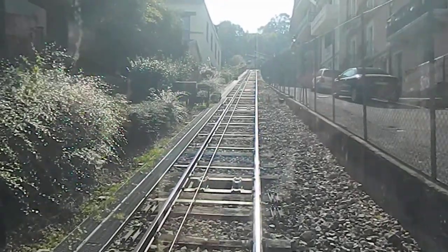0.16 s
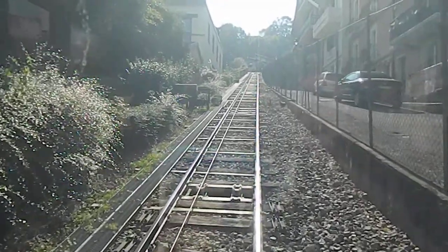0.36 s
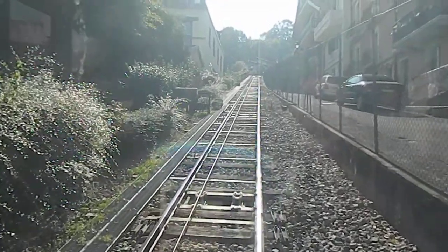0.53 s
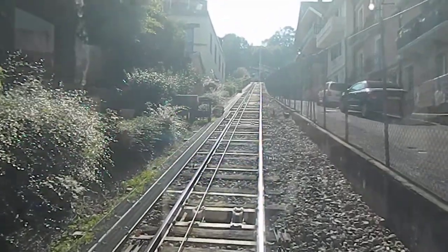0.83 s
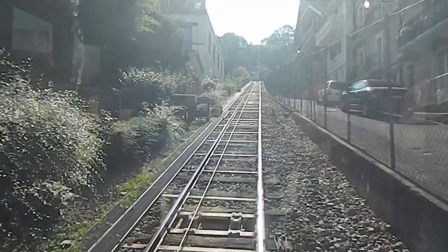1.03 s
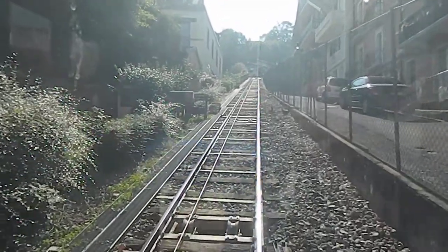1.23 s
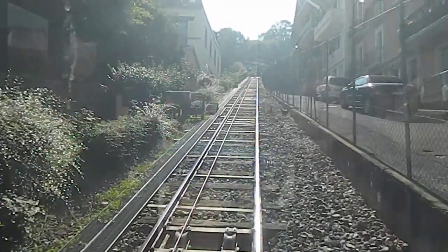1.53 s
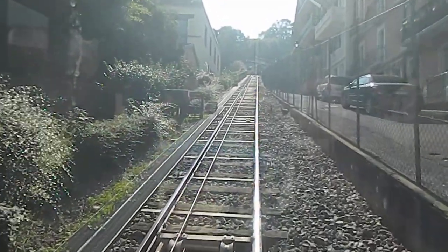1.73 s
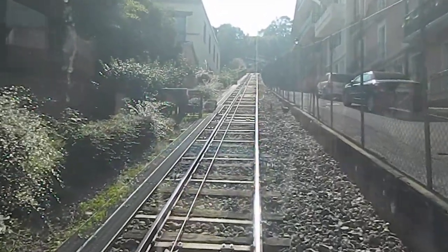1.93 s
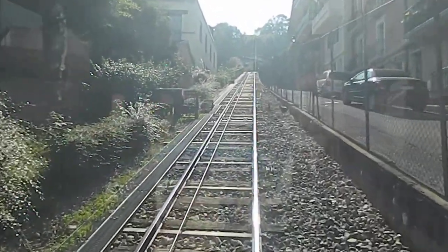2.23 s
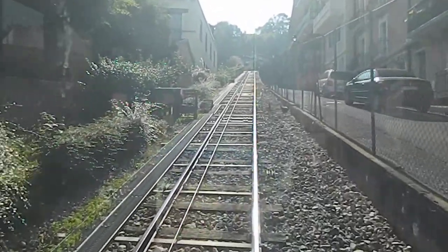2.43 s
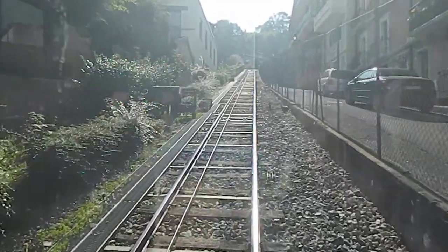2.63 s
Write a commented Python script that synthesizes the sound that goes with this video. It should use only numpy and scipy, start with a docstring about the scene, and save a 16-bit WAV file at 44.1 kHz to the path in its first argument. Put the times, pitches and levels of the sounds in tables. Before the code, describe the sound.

A funicular car rumbles low and steadily as it rolls uphill, heard from inside the cabin. A hum at the start turns rough, soft bumps come from the track, and the wheels swell into a brief clatter past the middle.

```python
"""Inside a funicular car rolling slowly uphill. The wheels shake the car body into a low rumble, with a
hum at first and soft bumps from the track. Steel rolls on the rails with a dull roar that swells into
a short clattering rush. Thin air hiss and a few brief scrapes lie on top, and the close walls add a
short echo."""
import sys
import numpy as np
from scipy import signal
from scipy.fft import rfft, irfft
from scipy.io import wavfile
from scipy.ndimage import uniform_filter1d

SR = 44100
rng = np.random.default_rng(int(sys.argv[2]) if len(sys.argv) > 2 else 0)


def materialize(psi):
    """Save the field psi as 16-bit PCM at rate SR to the path in sys.argv[1].

    A 1-D psi becomes a single channel; in a 2-D psi each row is a channel.
    """
    bounded = np.clip(np.atleast_2d(psi).T, -1, 1)
    quanta = np.round(bounded * 32767).astype(np.int16)
    wavfile.write(sys.argv[1], SR, quanta)


N = 122157
TIME = np.arange(N) / SR
FREQS = np.maximum(np.arange(N // 2 + 1) * SR / N, 1)  # Hz, never below 1

def gain(db):
    """Turn decibels into a number to multiply by."""
    return 10 ** (np.asarray(db) / 20)

def unit(x):
    """Scale a signal to an average power of 1."""
    return x / np.sqrt(np.mean(x ** 2))

def over_time(rows):
    """Join (t/s, value) points with straight lines."""
    return np.interp(TIME, *np.array(rows).T)

def colour(x, rows):
    """Make some pitches louder and others softer, following (f/Hz, level/dB) points."""
    hz, db = np.array(rows).T
    return irfft(rfft(x) * gain(np.interp(np.log(FREQS), np.log(hz), db)), N)

def noise():
    """White noise: all frequencies equally strong."""
    return rng.standard_normal(N)

def noise_band(hz, half_width):
    """Noise around one pitch, 6 dB weaker about half_width Hz to either side."""
    distance = (FREQS / hz - hz / FREQS) * hz / (2 * half_width)
    return irfft(rfft(noise()) / (1 + 1j * distance) ** 2, N)

def wobble(rate):
    """A smooth random wiggle; a higher rate (Hz) makes it quicker."""
    span = max(int(SR / rate), 2)
    smoothed = uniform_filter1d(noise(), span, mode="wrap")
    return unit(uniform_filter1d(smoothed, span, mode="wrap"))

def stereo(mid, side):
    """Left and right from what the ears share (mid) and what sets them apart (side)."""
    return np.array([mid + side, mid - side])

def wide_band(hz, width, side_db):
    """A band of noise in stereo; a higher side_db spreads it wider."""
    mid, side = (unit(noise_band(hz, width / 2)) for _ in range(2))
    return stereo(mid, gain(side_db) * side)

def hit_shape(age, rise_s, decay_s):
    """The loudness of a hit: a quick rise to 1, then a fade."""
    shape = (1 - np.exp(-(age / rise_s) ** 2)) * np.exp(-age / decay_s)
    return shape / shape.max()

def hiss(rows, side_db):
    """Stereo noise with the given colour."""
    mid, side = (unit(colour(noise(), rows)) for _ in range(2))
    return stereo(mid, gain(side_db) * side)

def air(steady_db=-51, fade_s=.013):
    """Air hisses steadily, with a few brief gusts."""
    # colour of the steady hiss: f/Hz, relative level/dB
    steady_colour = [(500, 6), (1500, -2.5), (2900, 1), (3900, -5), (5000, -6), (6500, -8.5), (8000, -12.5),
                     (11500, -15), (15500, -23)]
    # colour of the gusts: f/Hz, relative level/dB
    gust_colour = [(800, -4), (2500, 7.5), (4500, 6), (7000, 0), (9500, -0.5), (12500, -7.5), (15500, -16)]
    # gusts: t/s, length/s, level/dB
    gusts = [(0.938, 0.15, -61), (1.653, 0.097, -54), (1.73, 0.34, -56), (1.985, 0.13, -49.5),
             (2.514, 0.22, -60)]
    gust_power = 0
    for start, length, db in gusts:
        fade = np.clip(np.minimum(TIME - start, start + length - TIME) / fade_s, 0, 1)
        gust_power += (gain(db) * fade) ** 2
    steady = hiss(steady_colour, side_db=-1.5) * gain(steady_db)
    return steady + hiss(gust_colour, side_db=-4.5) * np.sqrt(gust_power)

def scrapes(rough_db=2):
    """The running gear under the car rubs and groans in short, rough swells."""
    # rubs: t/s, length/s, centre f/Hz, width/Hz, level/dB
    rubs = [(0.504, 0.072, 245, 100, -33), (0.47, .26, 686, 690, -45), (0.933, 0.08, 2150, 2189, -47),
            (0.945, 0.14, 700, 503, -43), (1.007, 0.059, 5000, 2500, -57), (1.559, 0.095, 270, 71.2, -37.5),
            (1.662, 0.09, 2230, 1810, -47.5), (1.874, 0.19, 248.7, 49.64, -35.5),
            (2.522, .08, 5450, 2200, -59), (2.576, 0.13, 685, 397, -45.5), (2.623, 0.053, 3260, 340, -50),
            (2.659, 0.047, 1950, 400, -49), (2.68, 0.072, 3480, 1090, -51.5)]
    out = 0
    for start, length, hz, width, db in rubs:
        swell = np.sin(np.pi * np.clip((TIME - start) / length, 0, 1))
        rough_level = gain(db + rough_db * wobble(210))
        out += swell * rough_level * wide_band(hz, width, side_db=-8)
    return out

def clatter():
    """The wheels knock on an uneven stretch of rail; each knock dies away fast."""
    # knocks: t/s, level at the loudest point/dB, centre f/Hz, width/Hz
    knocks = [(1.683, -47.5, 2580, 2500), (1.743, -36.5, 778, 220), (1.835, -50, 3250, 2200),
              (1.861, -36.5, 680, 450), (1.903, -40, 1410, 910), (1.915, -45.5, 2880, 1600),
              (2.262, -53.5, 3160, 2000)]
    out = 0
    for start, db, hz, width in knocks:
        age = np.maximum(TIME - start, 0)
        out += gain(db) * hit_shape(age, rise_s=.009, decay_s=.028) * wide_band(hz, width, side_db=-9)
    return out

def rolling(level_db=.5, grain_db=1.17, flutter_db=-.27):
    """Steel wheels on rails make a grainy roar; its highs spread wider than its lows."""
    # colour of the roar: f/Hz, relative level/dB
    roar_colour = [(120, -13), (225, -4.5), (350, -1), (500, -5), (750, -6), (1100, -11.5), (1800, -16.5),
                   (3000, -26), (3900, -37), (7000, -43.5), (15000, -57.5)]
    # loudness of the roar: t/s, relative level/dB
    loudness = [(0, -34), (.16, -36), (.33, -37), (.45, -37), (.52, -36.5), (.66, -37.5), (.8, -38),
                (.92, -40), (.96, -36), (1.06, -37.5), (1.2, -41.5), (1.5, -40), (1.665, -41.5),
                (1.69, -36), (1.77, -34), (1.92, -33.5), (2.09, -34.5), (2.13, -40.5), (2.27, -39.5),
                (2.38, -42), (2.65, -40), (2.77, -42)]
    # stereo spread: f/Hz, level of side against mid/dB
    spread = [(200, -36), (500, -22), (1000, -14.5), (2000, -8), (4000, -15.5), (12000, 10.5)]
    grain = gain(grain_db * wobble(400) + flutter_db * wobble(22))
    mid, side = (unit(colour(noise() * grain, roar_colour)) for _ in range(2))
    return stereo(mid, colour(side, spread)) * gain(over_time(loudness) + level_db)

def bumps(rise_s=.007):
    """Each bump in the track makes the floor boom for a moment."""
    # booms: t/s, level/dB, f/Hz, decay time/s
    booms = [(0.51, -13.5, 69.6, .012), (.54, -13.5, 105, 0.0076), (0.59, -28, 42, 0.018),
             (0.692, -25, 44.7, .016), (1.015, -16, 50, 0.0091), (1.02, -17, 153, 0.0099),
             (1.106, -16, 87.3, 0.019), (1.214, -15, 71, 0.024), (1.416, -14, 97.2, .02),
             (1.707, -14, 75.5, 0.024), (1.899, -12, 99.3, 0.016), (1.953, -12.5, 113, 0.011),
             (2.023, -9, 81.2, 0.016), (2.054, -13.5, 40.3, 0.031), (2.063, -15.5, 86, 0.015),
             (2.174, -12.5, 79.6, 0.0087), (2.467, -19, 57.6, 0.049), (2.489, -11, 90.7, 0.018),
             (2.573, -8.5, 100, 0.014), (2.724, -14.5, 89, 0.023)]
    out = 0
    for start, db, hz, decay_s in booms:
        age = np.maximum(TIME - start, 0)
        swing = -np.sin(2 * np.pi * hz * age)
        out += gain(db) * hit_shape(age, rise_s, decay_s) * swing
    return out

def hum(flutter_db=.4, half_width_hz=13.9):
    """The running gear drones at a pitch where the cabin rings, then breaks up into rough drumming."""
    # pitch of the drone: t/s, f/Hz
    pitch = [(0, 101.6), (.07, 107.1), (.24, 108.8), (.55, 108.5), (.85, 107.9), (1.05, 108.3)]
    # roughness: t/s, drumming's share of the power (0 to 1)
    roughness = [(1.15, 0), (1.5, .95)]
    # loudness of the hum: t/s, level/dB
    loudness = [(0, -17.5), (.1, -22.5), (.17, -19.5), (.26, -29), (.31, -23.5), (.38, -19), (.49, -27.5),
                (.56, -18), (.67, -22), (.77, -25), (.89, -33), (.96, -26), (1.06, -23), (1.18, -38.5),
                (1.65, -30.5), (1.9, -26), (2.2, -29), (2.35, -22.5), (2.77, -25)]
    hz, share = over_time(pitch), over_time(roughness)
    phase = 2 * np.pi * np.cumsum(hz) / SR
    drone = np.sqrt(2) * np.sin(phase) * gain(flutter_db * wobble(23))
    drumming = unit(noise_band(hz.mean(), half_width_hz))
    return (np.sqrt(1 - share) * drone + np.sqrt(share) * drumming) * gain(over_time(loudness))

def rumble(level_db=2.5, side_db=-17):
    """The rough track shakes the car body, which rings at many low pitches at once."""
    # pitches where body and cabin ring: f/Hz, half-width/Hz, relative level/dB
    body = [(35.5, 5, 0), (59, 8.3, -2), (84.3, 12.7, -1.5), (100.4, 5.9, -5.5), (117.5, 6.2, -5),
            (151.1, 7.6, -5), (167.55, 8.1, -5.5), (196.7, 7.2, -12.5), (253, 6.6, -16),
            (275.3, 8.6, -17.5), (297.8, 4.3, -18), (361, 25, -26), (440.4, 5.7, -20.5),
            (531.6, 4.7, -24.5)]
    # strength of the shaking: t/s, relative level/dB
    shaking = [(0, -25), (.28, -27), (.54, -26), (.7, -27.5), (.88, -28), (1.03, -26), (1.3, -30),
               (1.44, -30.5), (1.65, -27.5), (1.75, -25.5), (2.08, -25.5), (2.23, -27), (2.36, -25.5),
               (2.6, -30), (2.77, -25)]
    mid, side = (unit(sum(gain(db) * noise_band(hz, half) for hz, half, db in body)) for _ in range(2))
    return stereo(mid, gain(side_db) * side) * gain(over_time(shaking) + level_db)

def cabin(x, echo_s=.16, echo_db=-11.5, bass_hz=600):
    """Close walls and windows add a short, dense echo with little bass."""
    tail = rng.standard_normal((2, N)) * np.exp(-np.log(1000) * TIME / echo_s)  # 60 dB down at echo_s
    tail /= np.sqrt(np.sum(tail ** 2, axis=1, keepdims=True))
    bass_cut = FREQS / (FREQS + bass_hz)
    echo = irfft(rfft(x) * rfft(tail) * bass_cut, N)
    return x + gain(echo_db) * echo

def scene():
    """Everything heard in the cabin; the low sounds are stronger on the right."""
    # balance between the ears: f/Hz, left level minus right level/dB
    balance = [(35, -4.5), (90, -3.5), (180, -3.1), (350, -2.2), (700, -1.9), (1400, -1.4), (2800, 0),
               (12000, 0)]
    left, right = rumble() + hum() + bumps() + cabin(rolling() + air() + scrapes() + clatter())
    left = colour(left, [(hz, db / 2) for hz, db in balance])
    right = colour(right, [(hz, -db / 2) for hz, db in balance])
    return np.array([left, right])

def record(dry):
    """Take away the deepest bass and the very highest hiss."""
    low_hz, top_hz = 23, 15600
    dry = signal.sosfilt(signal.butter(4, low_hz, "high", fs=SR, output="sos"), dry)
    return signal.sosfilt(signal.ellip(10, .2, 80, top_hz, fs=SR, output="sos"), dry)

dry = scene()
out = record(dry)
materialize(out)
```